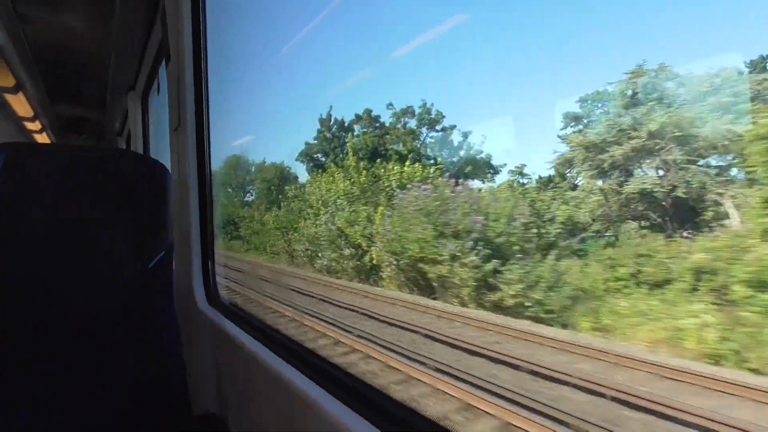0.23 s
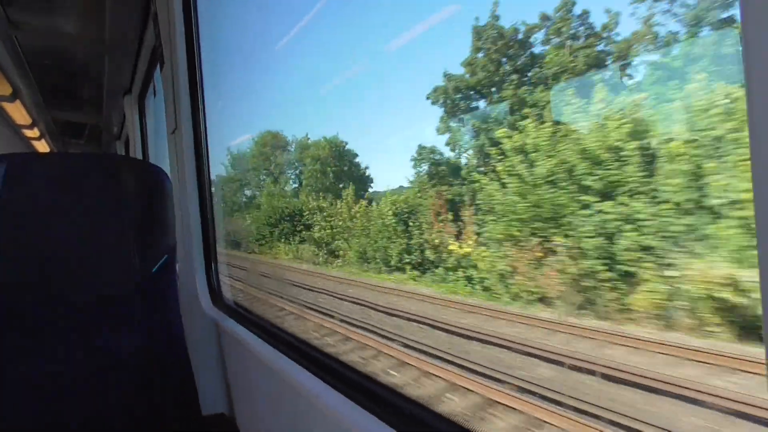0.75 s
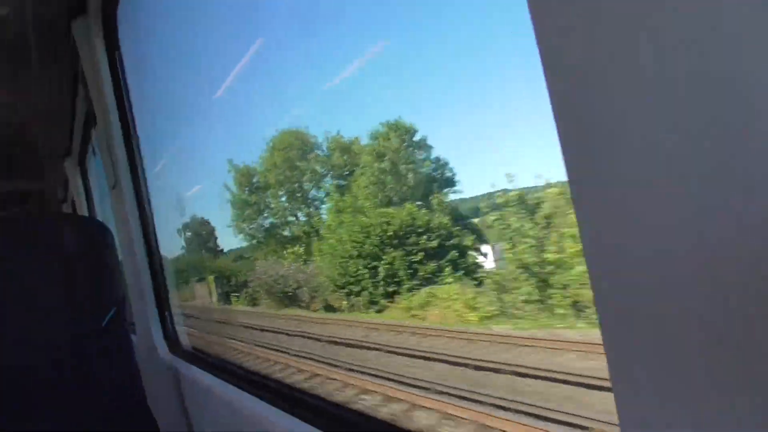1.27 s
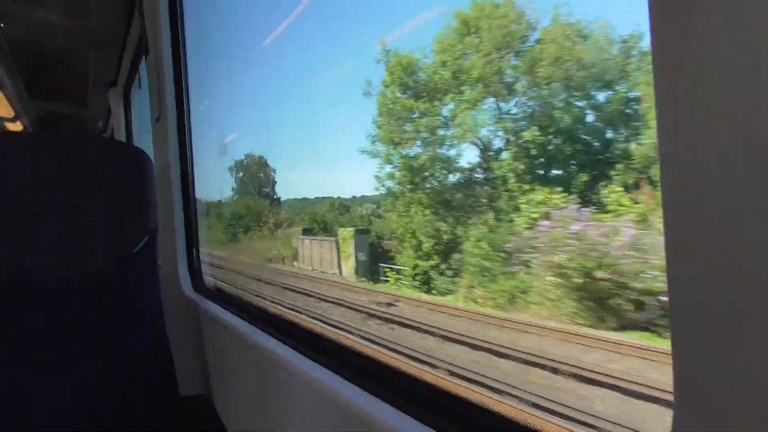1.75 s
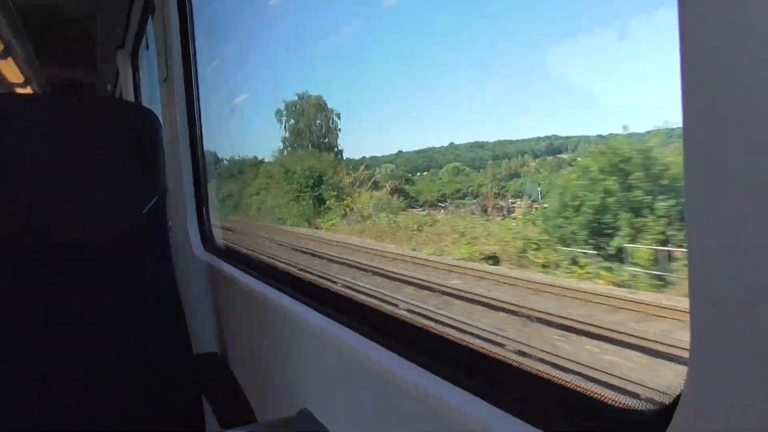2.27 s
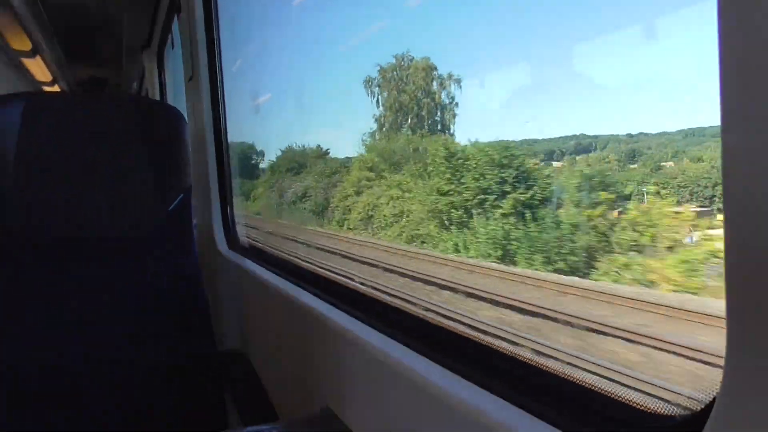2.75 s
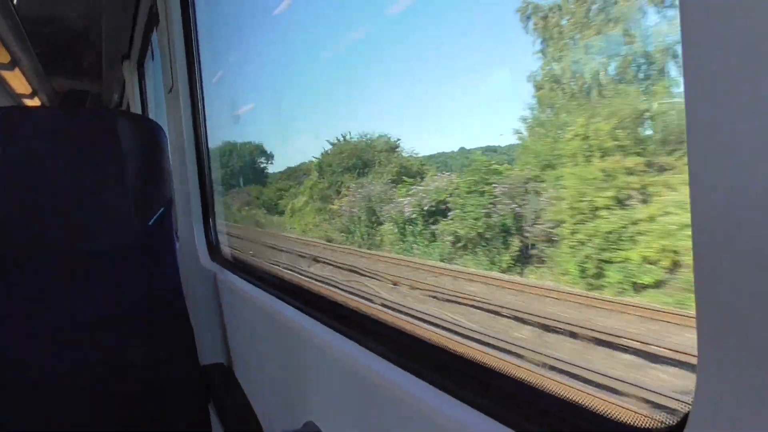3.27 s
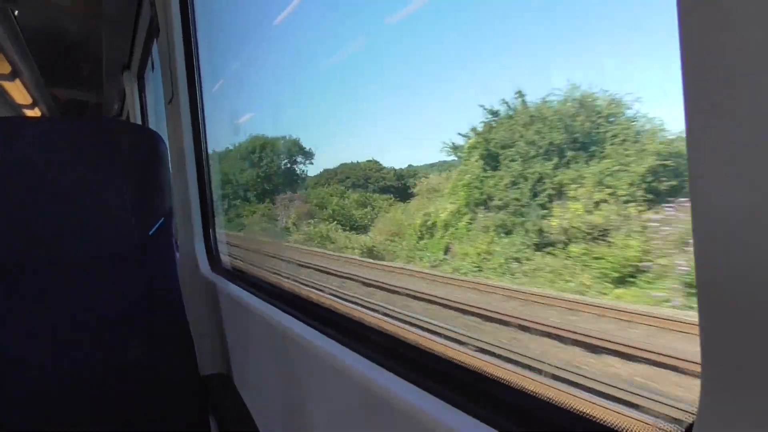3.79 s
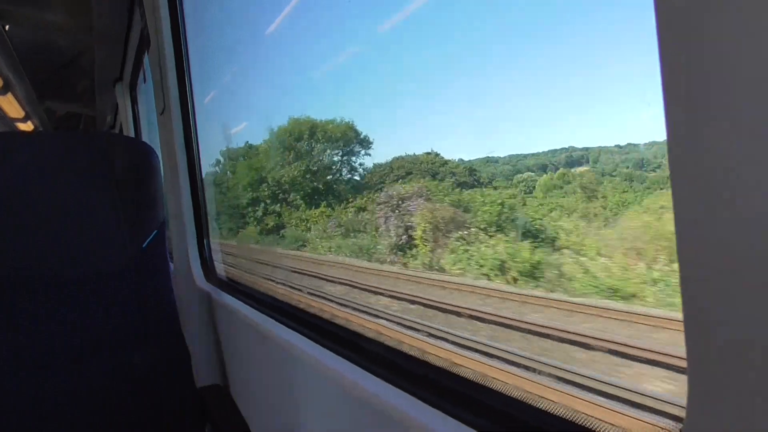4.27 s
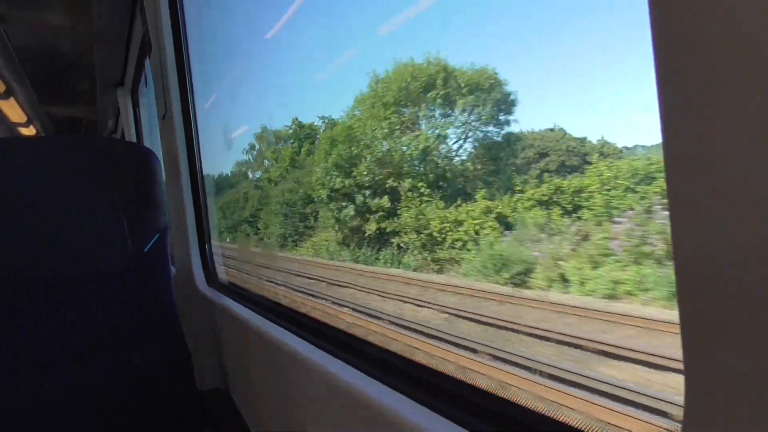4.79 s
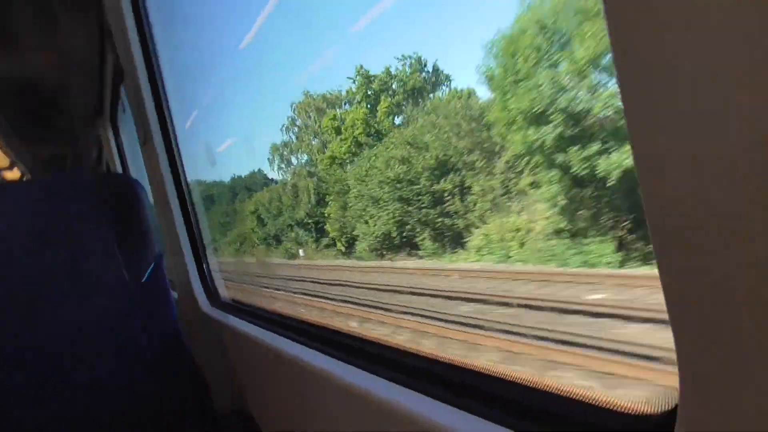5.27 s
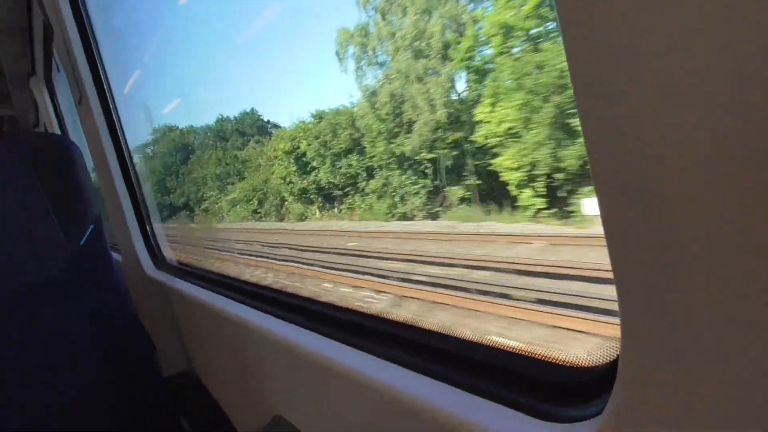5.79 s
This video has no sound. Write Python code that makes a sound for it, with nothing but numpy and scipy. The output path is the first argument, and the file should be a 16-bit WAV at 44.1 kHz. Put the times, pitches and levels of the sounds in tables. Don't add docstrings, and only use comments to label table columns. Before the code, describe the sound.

Deep, restless rumble inside a fast passenger train carriage, with a thin steady gear whine, faint air hiss and small plastic ticks and cloth rubs.

```python
import sys
import numpy as np
from scipy import signal
from scipy.fft import rfft, irfft
from scipy.io import wavfile
from scipy.ndimage import uniform_filter1d

SR = 44100
rng = np.random.default_rng(int(sys.argv[2]) if len(sys.argv) > 2 else 0)


def nominal_scale(level):
    x = np.asarray(level, float) / 20
    return 10 ** x


def bounce(signal):
    frames = np.transpose(np.atleast_2d(signal))
    limited = np.clip(frames, -1, 1)
    pcm = np.round(limited * 32767).astype(np.int16)
    wavfile.write(sys.argv[1], SR, pcm)


N = 266506
HZ = np.maximum(np.arange(N // 2 + 1) * SR / N, 1)
TIME = np.arange(N) / SR


def along_hz(points):
    hz, value = np.transpose(points)
    return np.interp(np.log(HZ), np.log(np.maximum(hz, 1)), value)


def along_time(table, slew=0):
    s, *columns = np.transpose(table)
    return [uniform_filter1d(np.interp(TIME, s, c), 1 + int(slew * SR)) for c in columns]


def noise(gain):
    x = irfft(rfft(rng.standard_normal((2, N))) * gain, N)
    return x / np.sqrt(np.mean(x ** 2))


def walk(rate):
    hold = int(SR / rate)
    steps = np.repeat(rng.standard_normal(N // hold + 1), hold)
    return 1.25 * uniform_filter1d(uniform_filter1d(steps, hold), hold)[:N]


def swells(rows, rest_db):
    power = nominal_scale(rest_db) ** 2
    for s, rise, fall, db in rows:
        slope = np.maximum(np.where(TIME < s, rise, fall), .01)
        power = power + nominal_scale(db) ** 2 * np.exp(-((TIME - s) / slope) ** 2)
    return 10 * np.log10(power)


def scuffs(table, rise_share):
    out = np.zeros((2, N))
    for s, db, hz, width, fall in table:
        start = int((s - .15) * SR)
        t = np.arange(-.15, .3, 1 / SR)
        f = np.arange(len(t) // 2 + 1) * SR / len(t)
        resonance = 1 / (1 + (2 * (f - hz) / width) ** 4)
        rub = irfft(rfft(rng.standard_normal((2, len(t)))) * resonance, len(t))
        rising = np.exp(-(t / max(rise_share * fall, .001)) ** 2)
        swell = np.where(t < 0, rising, np.exp(-t / max(fall, .002)))
        out[:, start:start + len(t)] += (nominal_scale(db) * swell * rub / rub.std())[:, :N - start]
    return out


def tone(hz, db, wander_hz, flutter_db, side_db):
    phase = 2 * np.pi * np.cumsum(hz + wander_hz * walk(9)) / SR
    level = np.sqrt(2) * nominal_scale(db + flutter_db * (walk(6.16) + 0.44 * walk(17)))
    return level * np.array([np.sin(phase), -nominal_scale(side_db) * np.cos(phase)])


def bounce_db():
    # start [t/s], length [s], hum [level/dB]
    bounces = [(.07, .2, -30), (0.657, 0.2, -29), (1.24, 0.13, -29.5), (2.02, .28, -29), (2.65, .33, -30),
               (3.12, .06, -38), (3.424, 0.066, -33), (3.664, 0.08, -31.5), (4.187, 0.11, -31.5),
               (4.36, 0.09, -38), (4.66, 0.19, -31), (5.023, 0.19, -30), (5.7, .06, -35), (5.9, 0.051, -34)]
    edge = 0.038
    rows = []
    for s, length, db in bounces:
        half = length / 2
        rows.append((s + half, half + edge, half + edge, db - 3))
    return swells(rows, rest_db=-38.5)


def rolling():
    # [f/Hz], density [level/dB per Hz]
    floor_colour = [(15, -45), (25, -24), (53, -9.5), (138, 0), (237, -1), (381, -9.5), (430, -7.5),
                    (504, -14), (915, -18.5), (991, -21), (1120, -21.5), (1700, -35.5), (2150, -30),
                    (2900, -44.5), (3770, -69), (6380, -120)]
    # [f/Hz], width [Hz], lift [dB]
    body = [(24, 14, 2.5), (42, 12, -2), (58, 8, -4), (70, 14, 4), (80, 14, 2), (95, 20, -2), (113, 12, -2),
            (130, 22, 3), (160, 18, 2), (192, 14, -3), (222, 36, 3), (275, 14, 2), (308, 24, 2),
            (355, 20, 2), (490, 30, 2), (560, 30, 2), (870, 40, 2), (1040, 40, 2), (1300, 40, 2),
            (1500, 120, 2), (2050, 120, 1), (2300, 200, 2), (2480, 80, 2), (1370, 60, 2.5), (1406, 9, 6),
            (1780, 140, -3), (1935, 70, 5)]
    # [t/s], [level/dB]
    rail_curve = [(0, -29.5), (1.1, -26), (1.35, -27.5), (1.8, -26.5), (2.2, -26.5), (2.5, -26.5),
                  (2.75, -26.5), (3.45, -25.5), (4.0, -27), (4.6, -28), (5.0, -26), (5.45, -26),
                  (6.04, -28.5)]
    roll_edges = [100, 440, 1700]
    # level over the rail [dB], share of rail swells [dB/dB], share of bogie bounce [dB/dB]
    layers = [
        (-11, 0.48, 0.47),
        (0, 0.46, 0.02),
        (-12, 0.41, 0.055),
        (-30.5, 0.19, 0.046),
    ]
    rail_mean_db, hum_mean_db = -26.5, -41.5

    lift_db = sum(db / (1 + (2 * (HZ - hz) / width) ** 2) for hz, width, db in body)
    colour = nominal_scale(along_hz(floor_colour) + lift_db)
    above = [1] + [1 / (1 + (hz / HZ) ** 8) for hz in roll_edges] + [0]
    rail = along_time(rail_curve, slew=0.05)[0] - rail_mean_db
    bogie = bounce_db() - hum_mean_db
    out = 0
    for (db, on_rail, on_bogie), lo, hi in zip(layers, above, above[1:]):
        level_db = rail_mean_db + db + on_rail * rail + on_bogie * bogie + 0.6 * walk(9.9)
        out = out + nominal_scale(level_db) * noise(colour * np.sqrt(np.abs(lo - hi)))
    return out


def panels():
    # [t/s], peak [level/dB], [f/Hz], width [Hz], length [s]
    rings = [(.8, -27, 129, 13, .08), (1.3, -26, 139, 16, 0.086), (2.2, -28.5, 145, 23, .06),
             (2.7, -30, 123, 27, 0.039), (3.42, -24, 153, 20, 0.056), (3.62, -24, 129.6, 18, 0.07),
             (4.1, -29.5, 214, 20, .06), (4.6, -26, 214, 21, .07), (4.58, -27, 145, 16, 0.057),
             (5.05, -29.5, 228, 22, 0.038), (5.4, -26.5, 151, 25, 0.056), (5.83, -25, 224, 33, 0.051)]
    return scuffs(rings, rise_share=0.86)


def bogie_hum():
    return tone(67.85, bounce_db() - 3.5, wander_hz=2.18, flutter_db=0.0, side_db=-25)


def singing():
    # [f/Hz], width [Hz], trim [dB]
    modes = [
        (646.5, 46, -2),
        (701.4, 23, 2.5),
        (992, 43, 0.8),
        (2156, 110, -5),
    ]
    # level at no pull [level/dB], gain at full pull [dB]
    sing = [
        (-42, -11),
        (-58, 17.5),
        (-50, 1.6),
        (-67, 16),
    ]
    # [t/s], pull [0-1]
    pull_curve = [(0, 0.1), (.6, 0), (1.5, 0.33), (2.3, 0), (3.1, 0), (3.7, 0.56), (4.4, 0.37), (4.9, 0.86),
                  (5.5, 0.63), (6.04, 0.8)]
    out = 0
    pull = along_time(pull_curve)[0]
    for (db, gain_db), (hz, width, trim_db) in zip(sing, modes):
        damping = 1 / (1 + (2 * HZ / width) ** 2)
        drive = noise(damping) + 1j * noise(damping)
        phase = 2 * np.pi * np.cumsum(hz * (1 + .004 * walk(1.5))) / SR
        level = nominal_scale(db + gain_db * pull + trim_db + 0.5 * walk(2.51))
        out = out + level * np.real(drive * np.exp(1j * phase))
    return out


def gear_whine():
    # [t/s], [f/Hz], [level/dB]
    mesh = [(0, 431, -38.5), (.7, 429.5, -38.5), (1.4, 430.7, -37), (2.1, 431.3, -36.5), (2.6, 430.3, -37),
            (3.6, 431, -35), (3.78, 432, -38.5), (3.95, 431.8, -37), (4.3, 431.4, -37), (5, 430.8, -37),
            (6.04, 429.9, -37)]
    hz, db = along_time(mesh, slew=.05)
    return tone(hz, db, wander_hz=0.8, flutter_db=1.5, side_db=-21)


def sleeve():
    # middle [t/s], rise [s], fall [s], weave [level/dB], nap [level/dB]
    strokes = [(.4, 0.1, 0.031, -57, -59.5), (.59, .06, 0.046, -68, -65), (1.09, 0.073, .15, -60.5, -59.5),
               (1.21, 0.11, 0.16, -62, -62), (2.3, 0.22, 0.12, -69, -68), (2.5, .12, 0.17, -63, -65),
               (3.13, .05, 0.18, -62, -61.5), (4.1, .06, .06, -66, -70), (5.17, .06, 0.11, -60, -60.5),
               (5.29, 0.089, 0.061, -58.5, -56.5), (5.55, .12, 0.24, -70, -63),
               (6.0, 0.087, .2, -57.5, -53)]
    # [f/Hz], density [level/dB per Hz]
    weave_colour = [(2300, -13), (2900, -5), (3500, -3), (4300, -2.5), (5500, -6.5), (7000, -8),
                    (9000, -28)]
    # [f/Hz], density [level/dB per Hz]
    nap_colour = [(4500, -30), (6000, -10), (7700, 2), (9000, 0.5), (10500, 0.5), (12500, -5.5),
                  (15000, -14), (16500, -17)]
    weave_db = swells([(s, rise, fall, db) for s, rise, fall, db, _ in strokes], rest_db=-67)
    nap_db = swells([(s, rise, fall, db) for s, rise, fall, _, db in strokes], rest_db=-67)
    grain = nominal_scale(0.53 * walk(150))
    weave = nominal_scale(weave_db) * noise(nominal_scale(along_hz(weave_colour)))
    nap = nominal_scale(nap_db) * noise(nominal_scale(along_hz(nap_colour)))
    return grain * (weave + nap)


def ticks():
    # [t/s], left [level/dB], right [level/dB], ring [s], dulling above 13 kHz [dB]
    snaps = [
        (1.8472, -36, -50, .0001, 0),
        (1.84952, -21, -18.5, .00022, 0),
        (4.462, -36, -34.5, .0007, -14),
    ]
    # [f/Hz], [level/dB]
    snap_modes = [
        (9100, -1.5),
        (4500, -22),
        (11500, -14),
        (14800, -17),
    ]
    # delay [s], left [level/dB], right [level/dB], smear [x ring]
    echoes = [
        (0, 1.5, 2.5, 1.3),
        (.0005, 0, -15, 0.68),
        (.0013, -12, -35, 2.5),
        (.0022, -27, -32, 3.7),
    ]
    out = np.zeros((2, N))
    for s, left_db, right_db, ring, dull_db in snaps:
        near = slice(int((s - .004) * SR), int((s + .012) * SR))
        for delay, echo_left_db, echo_right_db, smear in echoes:
            t = TIME[near] - s - delay
            swell = np.exp(-(t / (ring * smear * np.where(t < 0, 0.49, 1))) ** 2)
            for hz, db in snap_modes:
                db = db + dull_db * (hz > 13000)
                phase = 2 * np.pi * hz * t
                out[0, near] += nominal_scale(left_db + echo_left_db + db) * swell * np.sin(phase)
                out[1, near] += nominal_scale(right_db + echo_right_db + db) * swell * np.sin(phase + 1.4)
    return out


def knocks():
    # [t/s], peak [level/dB], [f/Hz], width [Hz], length [s]
    slips = [(1.2465, -45.5, 7870, 5500, .005), (1.2475, -49.5, 4500, 2200, .005),
             (1.2795, -54, 8500, 5000, .004), (1.2815, -53, 4300, 1800, .007),
             (1.852, -54, 10000, 6000, .004), (2.103, -54, 9500, 5000, .003),
             (2.203, -50, 11000, 5000, .005), (2.207, -54, 5100, 3500, .012),
             (2.212, -54, 9000, 8000, .015), (2.545, -46, 8900, 9000, 0.0065),
             (2.547, -47.5, 4370, 2310, .022), (2.551, -47, 2170, 700, .027),
             (2.555, -54, 8500, 7000, 0.025), (2.667, -54, 9700, 3500, .003),
             (3.491, -55, 6500, 4000, .012), (4.4612, -50, 11800, 3000, .0022),
             (4.505, -60, 4300, 3000, 0.088), (4.512, -63, 2800, 500, 0.066)]
    return scuffs(slips, rise_share=0.29)


def creaks():
    # [t/s], peak [level/dB], [f/Hz], width [Hz], length [s]
    flexes = [(.591, -68, 10300, 700, .03), (1.236, -57.5, 10000, 2200, .013), (1.622, -58, 9100, 900, .01),
              (1.637, -54.5, 8700, 800, .01), (2.071, -57, 2350, 400, .07), (2.141, -55, 2230, 500, .04),
              (2.192, -48, 2220, 500, 0.017), (2.509, -58, 10200, 1200, 0.022),
              (2.521, -55, 9100, 1400, 0.02), (2.751, -62, 7420, 2200, 0.016),
              (2.901, -49, 1306, 50, 0.046), (2.961, -60, 6500, 2200, .025), (3.125, -63, 9900, 2500, .028),
              (4.55, -59, 2210, 400, 0.13), (4.85, -61, 2200, 200, 0.1), (5.471, -58, 9500, 7000, 0.02),
              (5.551, -56, 5700, 1500, .016), (5.911, -57, 1650, 500, .03)]
    return scuffs(flexes, rise_share=1)


def vent():
    # [f/Hz], density [level/dB per Hz]
    hiss_colour = [(1590, -45), (2700, -3.5), (2840, -5), (3690, -1.5), (4190, -3), (4550, -1.5),
                   (5680, -4.5), (7830, -6.5), (15100, -23), (16000, -25)]
    return nominal_scale(-59.5 - 0.94 + .5 * walk(5.37)) * noise(nominal_scale(along_hz(hiss_colour)))


def two_ports(diffuse, tones):
    # [f/Hz], side minus mid [level/dB]
    side_curve = [(60, -28), (130, -34), (230, -20), (380, -22), (560, -8), (850, -11.5), (1400, -5),
                  (2100, -9), (3200, -5.5), (5200, -6.5), (7000, 0), (15000, 1)]
    # [f/Hz], left minus right [level/dB]
    left_curve = [(60, 2), (110, -1.5), (200, -0.5), (380, -4), (700, -0.5), (1290, 1), (2380, -2),
                  (4400, -1.0), (8120, -1), (15000, -8.5)]
    # [f/Hz], left leads [rad]
    lead_curve = [(40, -.5), (80, -0.3), (160, -0.25), (280, 0.047), (800, -0.57), (1300, 0.084),
                  (1900, -0.61), (3000, 0.19), (6000, .15)]
    mid, side = rfft(diffuse) * [np.ones(len(HZ)), nominal_scale(along_hz(side_curve))]
    tone_mid, tone_side = rfft(tones)
    mid, side = mid + tone_mid, side + tone_side
    tilt = nominal_scale(along_hz(left_curve) / 2) * np.exp(.5j * along_hz(lead_curve))
    ports = np.array([(mid + side) * tilt, (mid - side) / tilt]) * (HZ < 15770)
    return irfft(ports, N)


def scene():
    diffuse = rolling() + panels() + singing() + sleeve() + knocks() + creaks() + vent()
    tones = gear_whine() + bogie_hum()
    return two_ports(diffuse, tones) + ticks()


def top_cut(x):
    return signal.sosfilt(signal.butter(12, 16500, fs=SR, output="sos"), x)


def record(dry):
    return top_cut(dry)


dry = scene()
out = record(dry)
bounce(out)
```